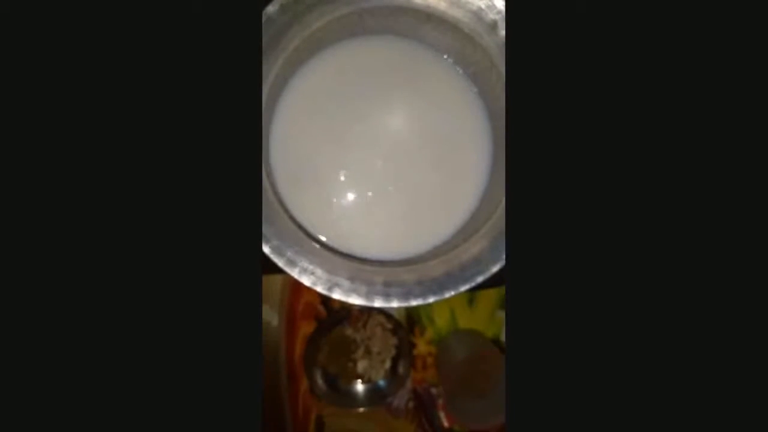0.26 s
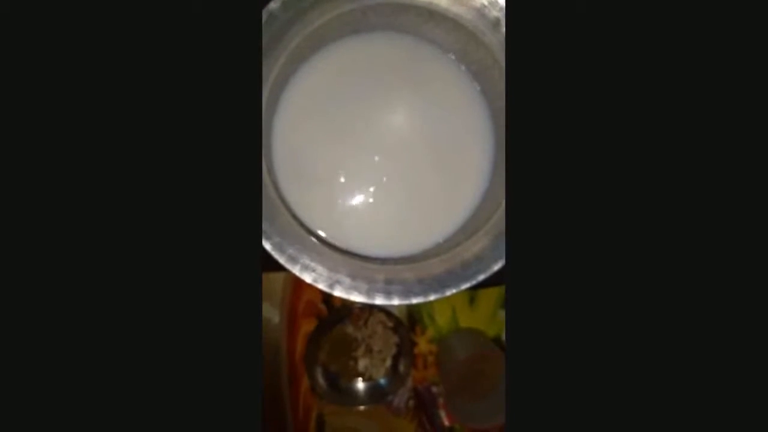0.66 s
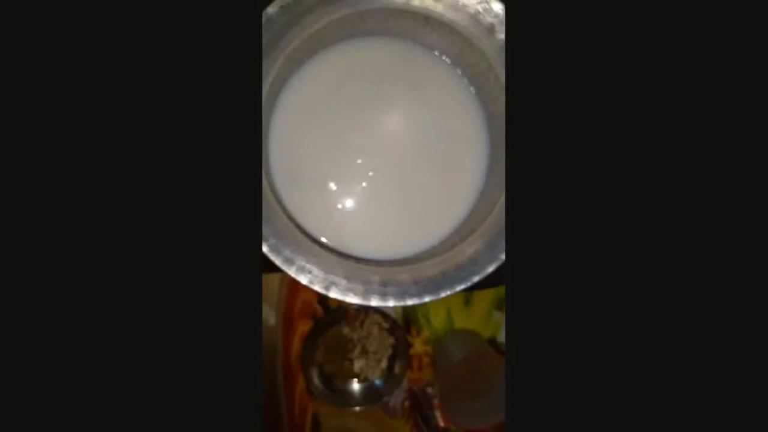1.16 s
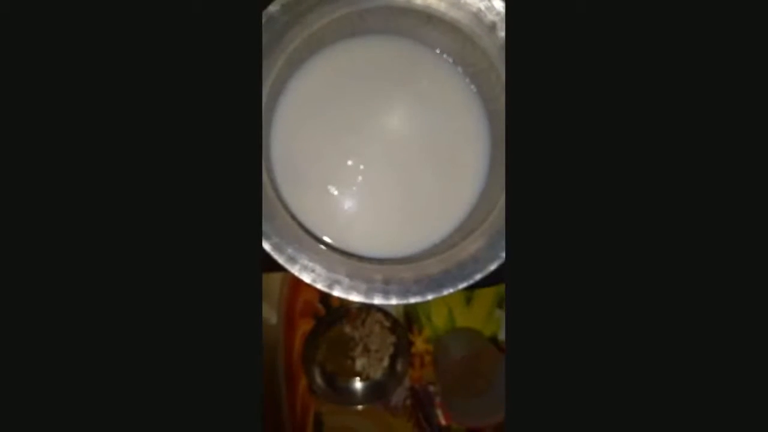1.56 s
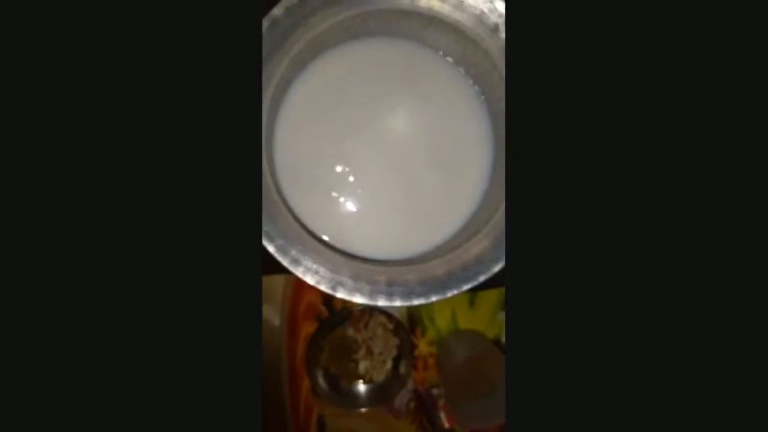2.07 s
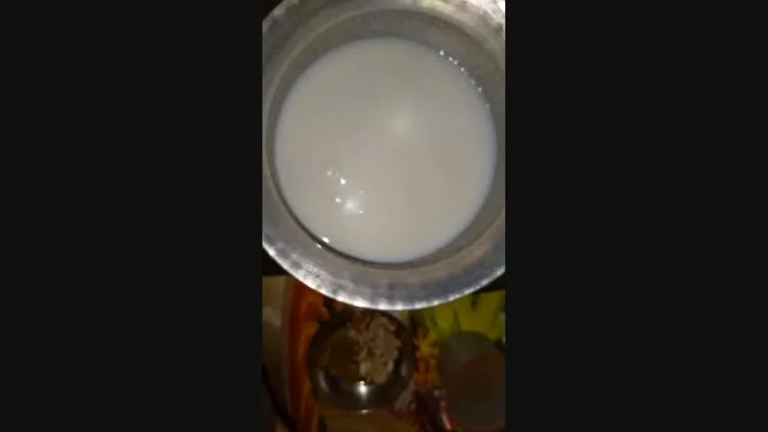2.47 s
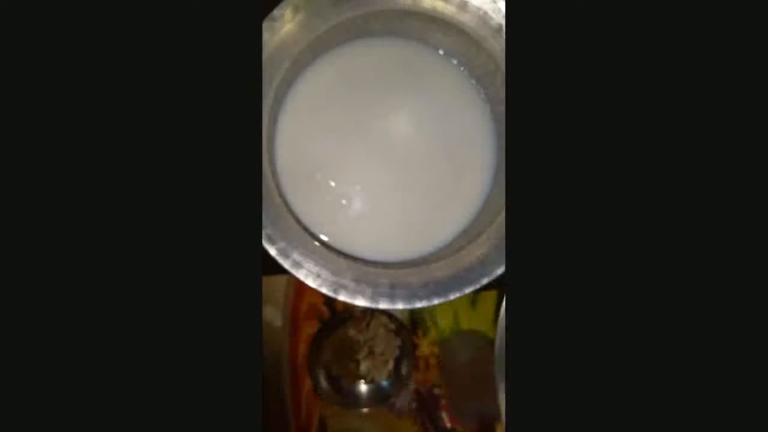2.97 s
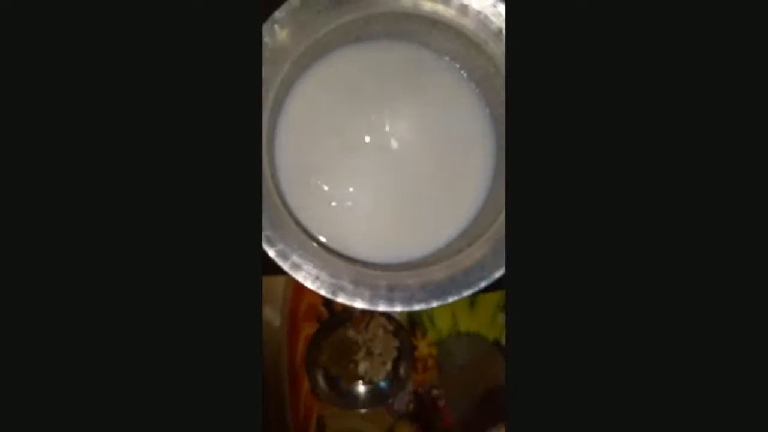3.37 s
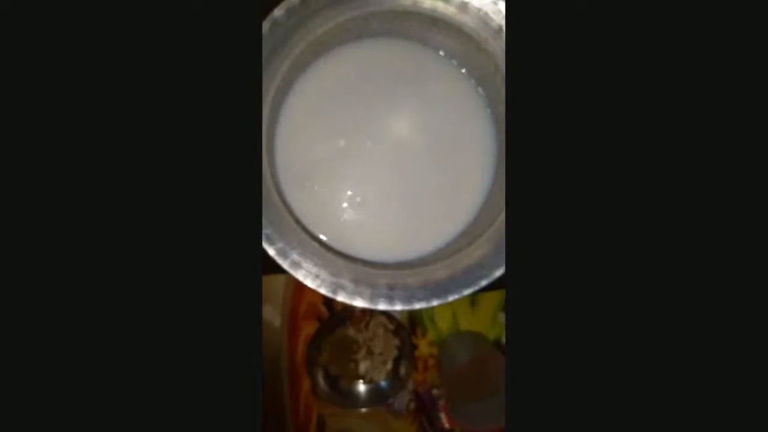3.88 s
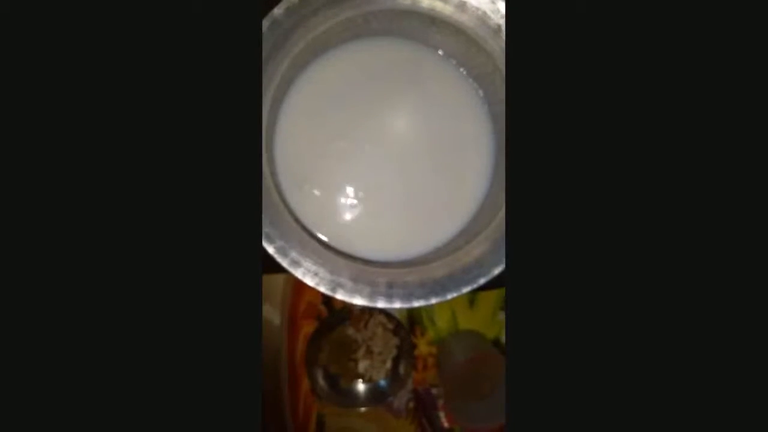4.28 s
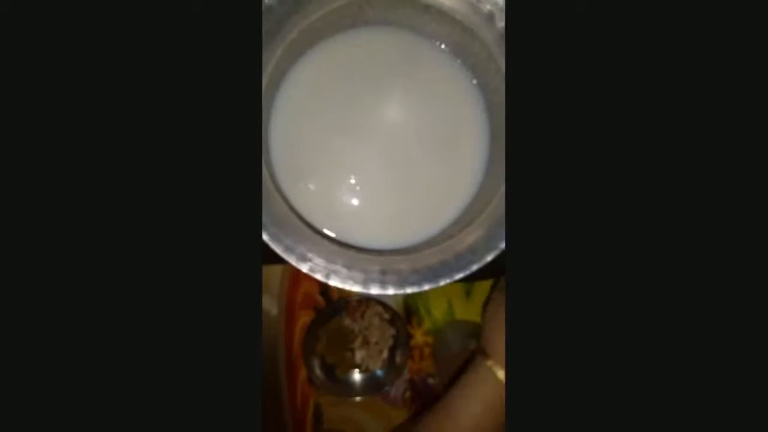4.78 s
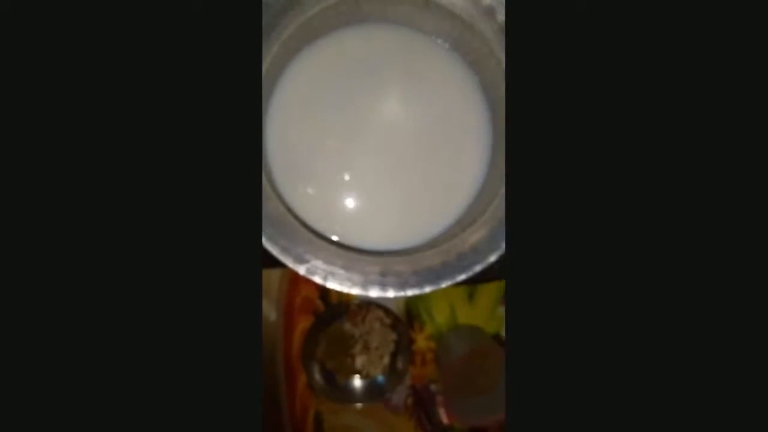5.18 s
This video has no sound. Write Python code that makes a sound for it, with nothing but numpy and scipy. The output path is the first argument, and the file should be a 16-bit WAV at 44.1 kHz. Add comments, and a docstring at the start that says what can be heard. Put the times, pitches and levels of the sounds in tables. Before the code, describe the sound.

Steady gas flame roar and hiss with thin whines, scratchy handling clicks up front, and a loud metallic scrape and knock near the end.

```python
"""A gas burner roars and hisses under a steel pot of milk, with a few thin steady whines.
Fingers rub and tick on the phone, close to its microphone; a short soft sizzle passes, and near
the end something scrapes across the stove top and knocks to a stop, and the small kitchen answers.
Flame and jet are filtered noise, whines are wavering sines, rubbing is noise under pressure envelopes,
ticks are decaying noise bursts, the stove top is a sum of decaying modes and the room a noise tail."""
import sys
import numpy as np
from scipy import signal
from scipy.fft import rfft, irfft, next_fast_len
from scipy.io import wavfile
from scipy.ndimage import uniform_filter1d, map_coordinates

SR = 44100
rng = np.random.default_rng(int(sys.argv[2]) if len(sys.argv) > 2 else 0)


def transcribe(u):
    """Save the signal u as a 16-bit wav file named by the first command-line argument.

    u: samples, shape (n,) or (channels, n), limited to [-1, 1]; the rate is SR.
    q: integer samples, one column per channel.
    """
    v = np.clip(np.atleast_2d(u).T, -1, 1)
    q = np.round(v * 32767).astype(np.int16)
    wavfile.write(sys.argv[1], SR, q)


N = 239581


def amp(db):
    """Decibels to amplitude gain: 20 dB is a factor of ten."""
    return 10 ** (np.asarray(db) / 20)


def unit(x):
    """Normalise to rms 1, so that levels can be set in decibels."""
    return x / np.sqrt(np.mean(x ** 2) + 1e-20)


def along(points, hz):
    """Interpolate (frequency, value) points on a logarithmic frequency axis."""
    point_hz, values = np.transpose(points)
    return np.interp(np.log(hz + 1), np.log(point_hz + 1), values)


def wobble(rate):
    """Slow random modulation: a spline through `rate` normal random knots a second."""
    knots = rng.standard_normal(int(N * rate / SR) + 4)
    return map_coordinates(knots, [np.arange(N) * rate / SR])


def coloured(x, spectrum):
    """Minimum-phase filter of unit power gain: folding the cepstrum makes a (Hz, dB) shape causal."""
    size = 2 * next_fast_len(N // 2 + SR // 4)
    gain = unit(amp(along(spectrum, np.fft.rfftfreq(size, 1 / SR))))
    cepstrum = irfft(np.log(gain))
    cepstrum[1:size // 2] *= 2
    cepstrum[size // 2 + 1:] = 0
    response = np.exp(rfft(cepstrum))
    return irfft(rfft(x, size) * response)[:N]


def resonate(x, modes):
    """Forced resonance: a broadband drive excites narrow modes, each at its own level."""
    size = 2 * next_fast_len(N // 2 + SR // 4)
    f = np.fft.rfftfreq(size, 1 / SR)
    response = 0
    for hz, width, db in modes:
        peak = (1j * f * width / (hz * hz - f * f + 1j * f * width)) ** 2  # squared: steep skirts
        response = response + amp(db) * peak / np.sqrt(np.mean(np.abs(peak) ** 2))
    return irfft(rfft(x, size) * response)[:N]


def noise():
    """White noise: equal power at all frequencies, rms 1."""
    return rng.standard_normal(N)


def brightened(x, db):
    """Treble shelf: raise or lower what lies above 10 kHz without shifting its phase."""
    treble = signal.sosfiltfilt(signal.butter(3, 10000, "high", fs=SR, output="sos"), x)
    return x + (amp(db) - 1) * treble


def patchy(x, depth_db):
    """Moving contact: as the contact point moves, different bands flare and fade."""
    bands = signal.stft(x, nperseg=512)[2]
    field = uniform_filter1d(rng.standard_normal(bands.shape), size=4, axis=0)  # smooth over frequency
    field = uniform_filter1d(field, size=8, axis=1)  # smooth over time
    return unit(signal.istft(bands * amp(depth_db * unit(field)), nperseg=512)[1][:N])


def friction(rough_db, slip_rate, patchy_db):
    """Sliding friction: noise that comes in tiny slips of uneven strength and colour."""
    grain = patchy(noise(), patchy_db)
    slips_db = rough_db * np.minimum(wobble(slip_rate), 2)
    return unit(grain * amp(slips_db))


def crackle(rate, t60):
    """Stick-slip: separate little catches, each with a sharp start and exponential decay."""
    catches = (rng.random(N) < rate / SR) * rng.uniform(.1, 1, N) ** 2
    energy = signal.lfilter([1], [1, -amp(-120 / (t60 * SR))], catches)
    return unit(np.sqrt(energy) * noise())


def push(start, length, attack, grows_db, fade_db_per_s):
    """Envelope of a rubbing contact: it sets in, changes by grows_db to gain 1 at its end, then fades."""
    t = np.arange(N) / SR - start
    held_db = grows_db * (np.clip(t / length, 0, 1) - 1)
    onset = np.clip(t / attack, 0, 1)
    return onset * amp(held_db - fade_db_per_s * np.maximum(t - length, 0))


def burst(t60):
    """Impact: broadband noise that starts at once and decays exponentially."""
    t = np.arange(SR // 4) / SR
    return rng.standard_normal(len(t)) * amp(-60 * t / max(t60, .002))


def add(track, s, sound):
    """Superposition: mix a sound in at time s (seconds), cut at the track's end."""
    part = track[round(s * SR):][:len(sound)]
    part += sound[:len(part)]


def burner():
    """Combustion and jet noise: random flow gives roar and hiss, and drives narrow resonances."""
    # spectrum of the flame: hz, relative_db
    roar_colour = [(25, -72), (50, -54), (70, -37), (100, -23.5), (155, -21), (190, -5), (265, 2),
                   (320, -6), (440, -1), (720, -10.5), (1100, -12.5), (1700, -17.5), (3000, -21.5),
                   (6000, -34.5)]
    # spectrum of the gas jet: hz, relative_db
    hiss_colour = [(1000, -22.5), (3000, -8.5), (5000, -6.5), (6300, -4.5), (8000, -5.5), (10000, -4),
                   (11000, 0.5), (12200, -0.5), (13200, -4), (15700, -7.5)]
    # narrow resonances of burner and jet: hz, width_hz, rms_db
    burner_modes = [(268.5, 13, -54), (613.4, 15, -61.5), (2225, 150, -68), (6850, 59, -60),
                    (7030, 210, -53), (8780, 140, -72)]
    roar = amp(-46.0 + 1.15 * wobble(6.07)) * coloured(noise(), roar_colour)
    hiss = amp(-48.0 + 0.59 * wobble(5.04)) * coloured(noise(), hiss_colour)
    treble_drift_db = 0.3 * wobble(1.65)
    return roar + brightened(hiss, treble_drift_db) + resonate(noise(), burner_modes)


def whines():
    """Frequency and amplitude modulation: thin sines waver a little in pitch and level."""
    # steady whines: pitch_hz, mean_level_db (rms)
    whine_tones = [(100, -85), (398, -60), (2079, -68.5), (2175, -71), (2222, -62), (2267, -69),
                   (2982, -78), (3735, -65.5), (4016, -68.5), (4113, -71.5), (4160, -66), (4253, -76)]
    total = np.zeros(N)
    for hz, db in whine_tones:
        phase = 2 * np.pi * np.cumsum(hz * (1 + 0.000586 * wobble(12))) / SR
        total += np.sqrt(2) * amp(db + 1.1 * wobble(3.93)) * np.sin(phase)
    return total


def rubbing():
    """Stick-slip of skin on the phone's case; each stroke takes over as the last one fades."""
    # light strokes: start_s, length_s, level_db, brightness_db
    light_strokes = [(-0.005, .025, -32.5, -4.5), (0.063, 0.1, -37, -3), (.13, 0.088, -31.5, -2),
                     (0.217, .09, -36.5, -4.5), (0.35, 0.037, -39.5, -2), (.525, .145, -37.5, 3.5),
                     (.67, 0.082, -33, 2), (0.77, 0.07, -38.5, 0), (.885, .025, -43, -6),
                     (0.985, 0.038, -41, -4), (1.063, 0.19, -52, 3), (1.22, 0.024, -38, 1.5),
                     (1.272, 0.015, -40, -9), (1.47, 0.074, -45, -1), (1.692, .08, -45.5, -3),
                     (2.02, .05, -51, 2), (2.228, .09, -51, 3), (2.477, 0.034, -46, -7)]
    attack_s, grows_db, fade_db_per_s = 0.016, 1, 280
    slips = friction(rough_db=0.0, slip_rate=340, patchy_db=5.0)
    skin = slips + amp(-0.5) * crackle(rate=140, t60=0.021)
    pressures = np.array([amp(db) * push(s, length, attack_s, grows_db, fade_db_per_s)
                          for s, length, db, _ in light_strokes])
    strongest = pressures.argmax(axis=0)
    bright_db = np.array([treble_db for *_, treble_db in light_strokes])[strongest]
    return brightened(pressures.max(axis=0) * skin, uniform_filter1d(bright_db, size=512))


def firm_stroke():
    """Sliding friction under growing pressure: the strokes that make the phone's case sing."""
    # firm strokes: start_s, length_s, level_db
    firm_strokes = [(2.605, .135, -34.5), (2.88, 0.028, -48)]
    attack_s, grows_db, fade_db_per_s = 0.025, 5, 230
    pressure = sum(amp(db) * push(s, length, attack_s, grows_db, fade_db_per_s)
                   for s, length, db in firm_strokes)
    return pressure * friction(rough_db=3.5, slip_rate=370, patchy_db=1.0)


def fingers():
    """Impact and friction: rubs and ticks share a colour, firm strokes ring the phone's case."""
    # bright spectrum of rubs and ticks: hz, relative_db
    rub_colour = [(2000, -30), (5000, -23.5), (6300, -17.5), (6850, -1.5), (7900, -6.5), (8850, 1),
                  (9500, -9), (10200, -2.5), (11200, -6.5), (12200, -1.5), (13400, -6.5), (14500, -12),
                  (15700, -2)]
    # ringing modes of the phone's case: hz, width_hz, relative_db
    case_modes = [(6940, 130, -10), (7280, 89, -9.5), (8520, 180, -7), (10270, 79, -6.5),
                  (11500, 220, -7.5), (12260, 340, -3), (14660, 200, -4)]
    # close ticks: start_s, level_db, body_db (relative to the tick), t60_s, brightness_db
    tick_events = [(0.1405, -20, -27, 0.037, -9), (0.153, -22, -29, 0.037, -9),
                   (0.188, -23.5, -27, 0.027, 2), (0.2115, -23, -27, .027, -6),
                   (0.2915, -22, -27, 0.033, 0), (0.512, -22, -24, 0.019, 0), (0.5606, -27, -27, 0.037, 2),
                   (0.581, -19.5, -27, 0.032, 4), (0.5947, -22, -13, 0.024, 2), (0.73, -21, -27, .03, 2),
                   (0.7992, -20.5, -27, 0.033, -6), (0.871, -28, -25, .025, 2),
                   (0.989, -24, -30, 0.027, -5), (1.088, -26, -25, .018, -2), (1.45, -24, -8, 0.039, 2),
                   (1.4908, -21.5, -32, 0.037, -6), (1.5132, -28, -25, .03, -1),
                   (1.63, -17, -26, 0.017, -10), (1.732, -28, -28, .02, -5),
                   (2.83, -42.5, -23, 0.022, 13.5), (3.077, -29, -9, 0.034, 12), (3.102, -43, -20, .13, 6),
                   (3.2281, -34, -24, .02, 12)]
    # duller taps and scuffs: start_s, level_db, t60_s, brightness_db
    tap_events = [(3.083, -27.5, 0.038, -2), (3.237, -33.5, 0.042, 4), (3.247, -36.5, 0.041, -5),
                  (3.288, -46.5, 0.14, 9.5), (4.012, -35.5, .12, -5), (4.156, -40.5, 0.18, 4),
                  (4.204, -30.5, 0.05, -2), (4.212, -35.5, 0.13, 1), (4.251, -37, .08, 2),
                  (4.264, -35, 0.22, 0)]
    # spectrum of the taps and of the ticks' body: hz, relative_db
    tap_colour = [(60, -27), (300, 0), (1200, -5), (2700, -8.5), (5000, -1), (8500, 3.5), (12000, 7),
                  (15700, -2)]
    # soft bumps: start_s, level_db
    bump_events = [(0.512, -68), (1.46, -67), (1.63, -70), (3.066, -61), (3.222, -59)]
    ticks, taps, bumps = np.zeros((3, N))
    for s, db, body_db, t60, treble_db in tick_events:
        tick = amp(db) * burst(t60)
        add(ticks, s, brightened(tick, treble_db))
        add(taps, s, amp(body_db) * tick)
    for s, db, t60, treble_db in tap_events:
        add(taps, s, amp(db) * brightened(burst(t60), treble_db))
    for s, db in bump_events:
        add(bumps, s, amp(db) * burst(t60=0.13))
    stroke = firm_stroke()
    bright = coloured(rubbing() + ticks + amp(-2.5) * stroke, rub_colour)
    singing = amp(-4) * resonate(stroke, case_modes)
    soft = coloured(bumps, [(30, 2), (90, -4), (250, -35), (1000, -70)])
    return bright + singing + coloured(taps, tap_colour) + soft


def sizzle():
    """Band-limited noise under a weakening envelope: a soft rasp, like a spit of steam at the pot wall."""
    flow = push(start=1.33, length=0.15, attack=.008, grows_db=-8, fade_db_per_s=600)
    rasp = friction(rough_db=1.5, slip_rate=700, patchy_db=1.5)
    colour = [(2500, -30), (3700, -5.5), (4600, -5), (5600, 2), (6400, -8), (8000, -46)]
    return amp(-52.5) * flow * coloured(rasp, colour)


def knock(modes):
    """Modal synthesis: a blow sets the stove top's modes ringing, each with its own decay."""
    t = np.arange(SR // 2) / SR
    ring = 0
    for hz, db, t60 in modes:
        level_db = db + rng.normal(0, 2.8)  # each blow excites the modes differently
        ring = ring + amp(level_db - 60 * t / t60) * np.sin(2 * np.pi * (hz * t + rng.random()))
    blow = amp(9.5 - 60 * t / 0.018) * np.sin(2 * np.pi * 430 * t)  # gone in a few cycles
    onset = 1 - np.exp(-t / 0.0008)
    return (ring + blow) * onset


def scrape():
    """Friction and impact on a plate: a slide gathers speed, catches several times and thuds."""
    # spectrum of the grit: hz, relative_db
    grit_colour = [(1760, -53), (3000, -19), (3640, -17.5), (4510, -11.5), (4910, -15.5), (6000, -9.5),
                   (6520, -10), (7800, -4), (10200, -6), (11100, 2.5), (12800, -4.5), (15100, -3.5),
                   (15700, -11)]
    # spectrum of the stove top's body: hz, relative_db
    body_colour = [(40, -49), (150, -35), (300, -4), (650, 0), (950, -6.5), (1200, 1.5), (1450, -4.5),
                   (2100, -1), (2900, -3.5), (4000, -18), (7000, -27)]
    # resonances that the dragging metal excites: hz, width_hz, relative_db
    squeal_modes = [(7680, 130, -23), (10350, 160, -19), (11600, 400, -18)]
    # knocks along the scrape: start_s, crack_db, thud_db (before a common cut of 6.5 dB)
    knock_events = [(4.964, -16, -23), (4.991, -17, -24.5), (5.027, -13, -28.5), (5.035, -18, -34),
                    (5.061, -35, -24)]
    # modes of the stove top: hz, relative_db (varied at each knock), t60_s
    top_modes = [(307, -6, 0.13), (346.4, -2, 0.19), (371, -10, 0.28), (403, -6.5, 0.18), (427, -6, 0.24),
                 (507, 2, 0.13), (633, -5, 0.11), (1217, -24, 0.27), (1673, -11.5, 0.39), (1805, -11, 0.27),
                 (2040, -12, 0.26)]
    start_s, length_s, attack_s = 4.874, 0.15, 0.04
    body_lag_s = 0.0054  # the body follows the grit a little late
    slide = push(start_s, length_s, attack_s, grows_db=9, fade_db_per_s=210)
    shake = push(start_s + body_lag_s, length_s, attack_s, grows_db=13.5, fade_db_per_s=200)
    grit = amp(-18) * slide * friction(rough_db=0.0, slip_rate=600, patchy_db=3.5)
    body = amp(-28.5) * shake * friction(rough_db=1, slip_rate=300, patchy_db=2.5)
    thuds = np.zeros(N)
    for s, crack_db, thud_db in knock_events:
        add(grit, s, amp(crack_db) * burst(t60=0.054))
        add(thuds, s, amp(thud_db - 6.5) * knock(top_modes))
    # thin sheet radiates no bass
    thuds = signal.sosfilt(signal.butter(4, 220, "high", fs=SR, output="sos"), thuds)
    return coloured(grit, grit_colour) + resonate(grit, squeal_modes) + coloured(body, body_colour) + thuds


def kitchen(x):
    """Reverberation: convolution with a decaying noise tail whose treble dies sooner than its bass."""
    # reverberation time of the room: hz, t60_s
    room_decay = [(200, 0.42), (2000, 0.31), (8000, 0.29), (15000, 0.27)]
    hz, t, bands = signal.stft(rng.standard_normal(SR // 2), SR, nperseg=256)
    decay = amp(-60 * t / along(room_decay, hz)[:, None])
    tail = signal.istft(bands * decay, SR, nperseg=256)[1]
    tail = np.pad(tail, (SR // 200, 0))  # the tail starts 5 ms after the direct sound
    return signal.fftconvolve(x, tail / np.linalg.norm(tail))[:N]


def scene():
    """Superposition at one microphone: direct sounds and room tail, the same in both channels."""
    near, slide = fingers(), scrape()
    room = kitchen(amp(-7) * near + amp(-9.0) * slide)
    mono = burner() + whines() + sizzle() + near + slide + room
    return np.array([mono, mono])


def record(dry):
    """Band limiting: the recorder keeps nothing from 15750 Hz up."""
    size = 2 * next_fast_len(N // 2 + SR // 4)
    kept = np.fft.rfftfreq(size, 1 / SR) < 15750
    return irfft(rfft(dry, size) * kept)[:, :N]


dry = scene()
out = record(dry)
transcribe(out)
```